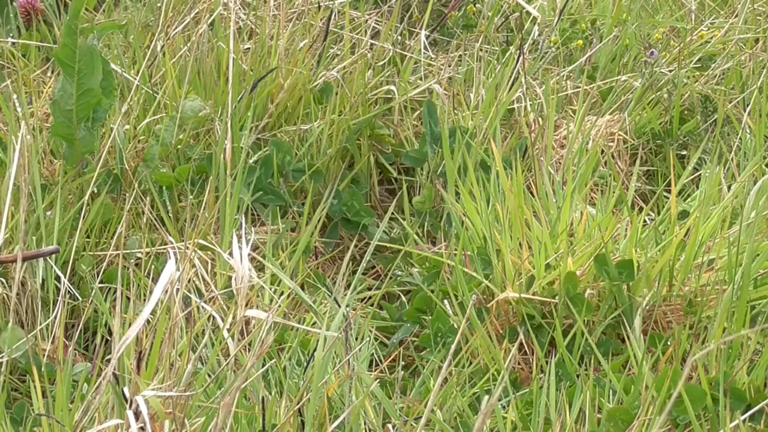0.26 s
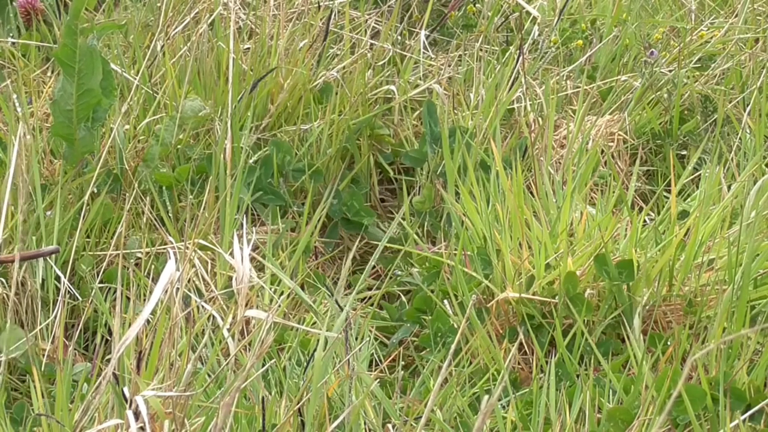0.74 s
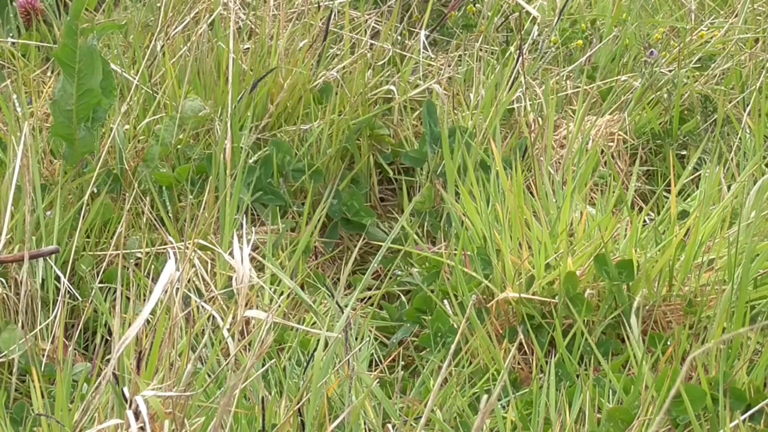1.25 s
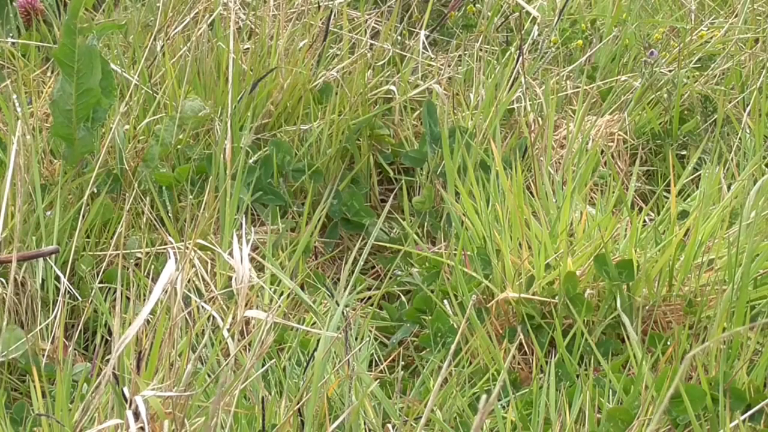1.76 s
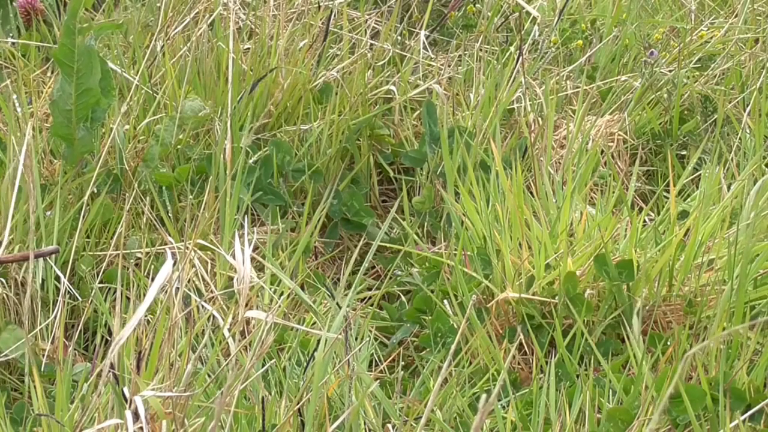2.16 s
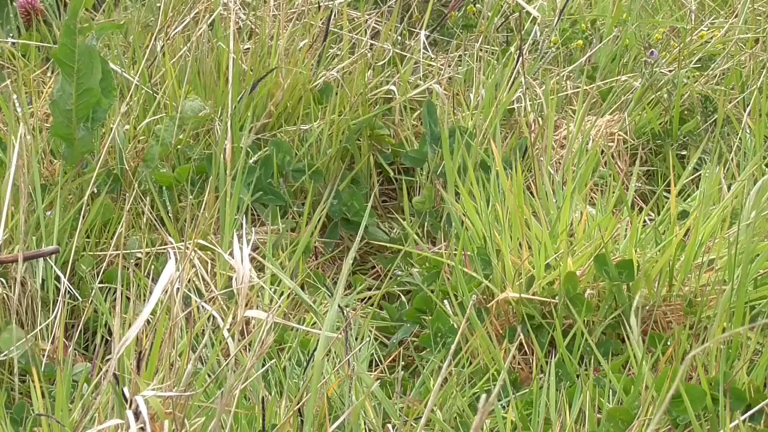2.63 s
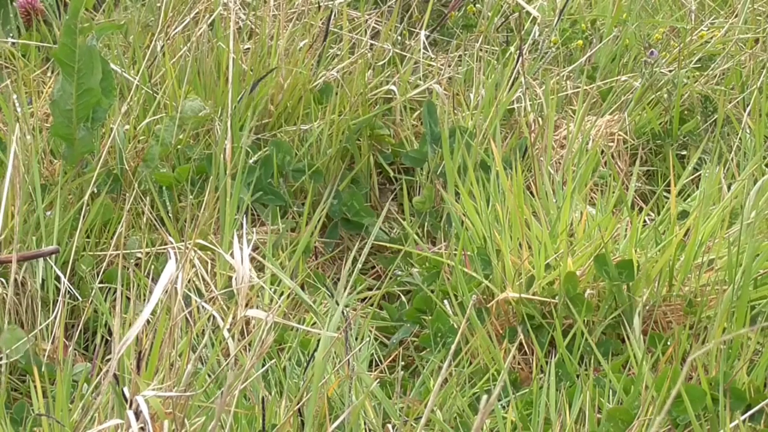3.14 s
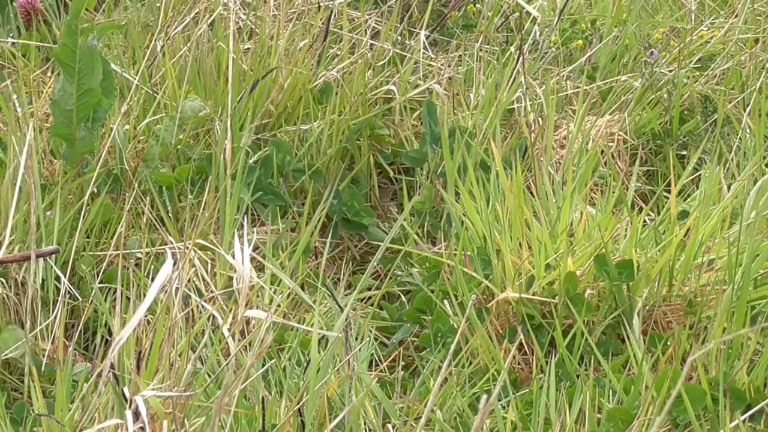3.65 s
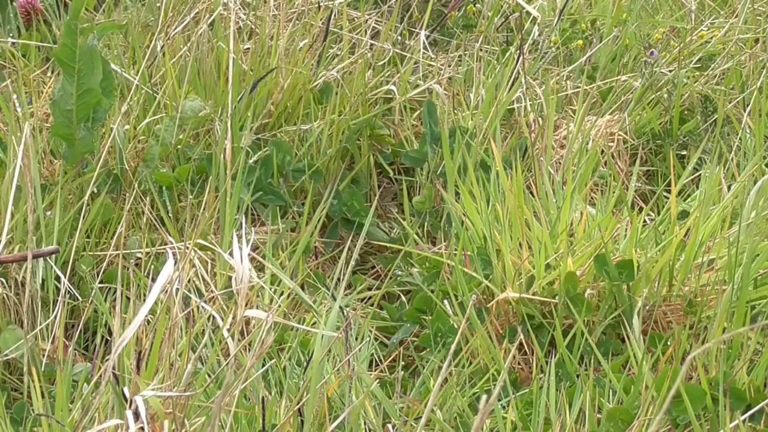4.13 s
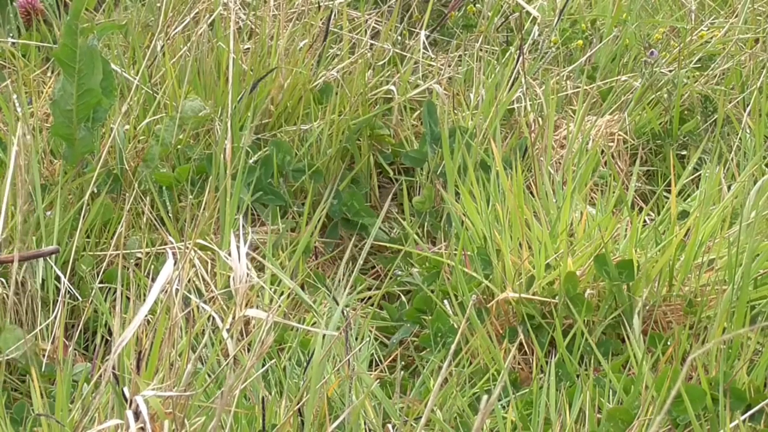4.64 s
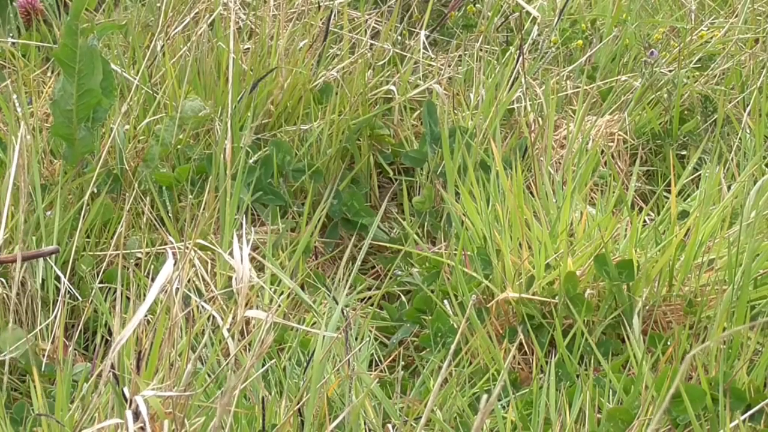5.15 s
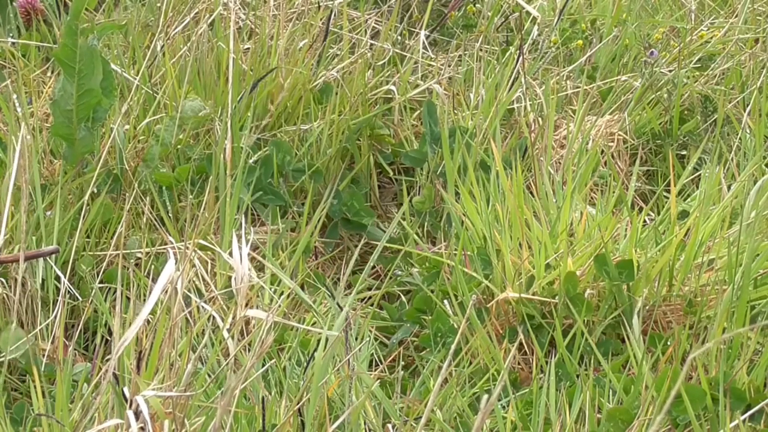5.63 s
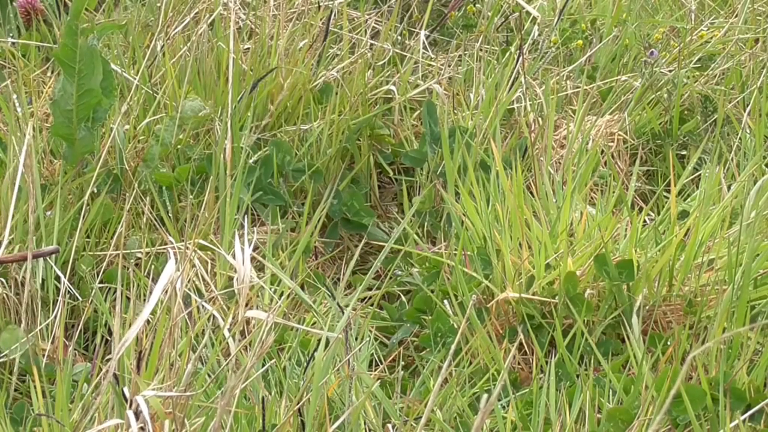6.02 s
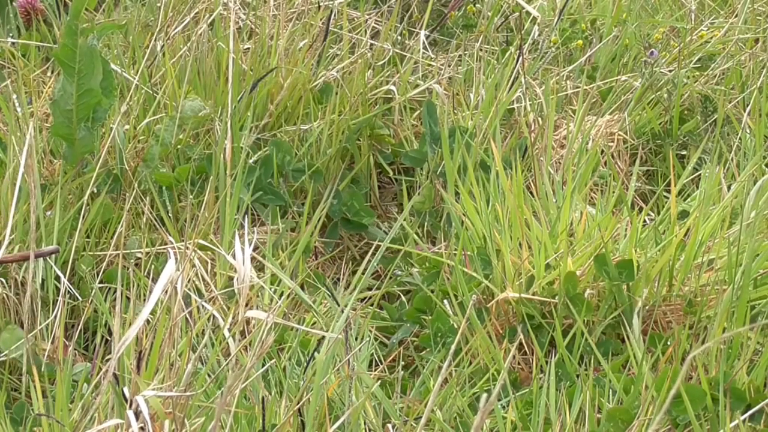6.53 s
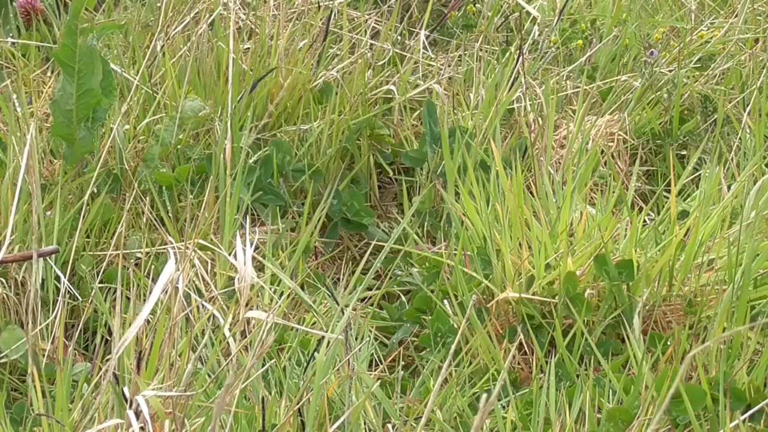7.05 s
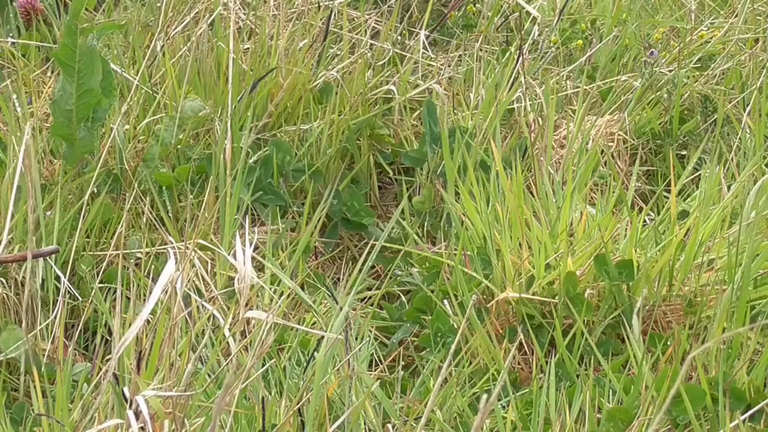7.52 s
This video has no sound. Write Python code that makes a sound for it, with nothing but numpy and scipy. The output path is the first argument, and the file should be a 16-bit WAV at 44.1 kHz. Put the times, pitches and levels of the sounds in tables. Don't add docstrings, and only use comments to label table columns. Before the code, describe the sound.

A skylark sings continuously in an open meadow, slightly right of centre: fast trills of tiny swept notes, sharp chips, buzzes and a few held falling whistles. Another lark and other birds call faintly from far away. Underneath lie a soft hiss of air and grass and a low traffic drone. Around three seconds a gust thuds into the stereo microphone, then dies away.

```python
import sys
import numpy as np
from scipy import signal
from scipy.fft import rfft, irfft, next_fast_len
from scipy.io import wavfile
from scipy.ndimage import uniform_filter1d

SR = 44100
rng = np.random.default_rng(int(sys.argv[2]) if len(sys.argv) > 2 else 0)


def undo_db(level):
    steps = np.asarray(level, float) / 20
    return 10 ** steps


def waveform_to_disk(signal):
    frames = np.transpose(np.atleast_2d(signal))
    scaled = np.clip(frames, -1, 1) * 32767
    samples = np.round(scaled).astype(np.int16)
    wavfile.write(sys.argv[1], SR, samples)


N = 343098


def unit(x):
    return x / np.sqrt(np.mean(x ** 2) + 1e-20)


def curve(rows):
    return np.interp(np.arange(N) / SR, *np.transpose(rows))


def drift(rate_hz):
    knots = rng.standard_normal(6000)
    return np.interp(np.arange(N) * rate_hz / SR, np.arange(len(knots)), knots)


def band(x, low_hz, high_hz):
    return signal.sosfilt(signal.butter(2, [low_hz, high_hz], "band", fs=SR, output="sos"), x)


def pair(right, other, table, colour):
    size = next_fast_len(N)
    log_hz = np.log(np.arange(size // 2 + 1) * SR / size + 1)
    hz, left_db, like, turn = np.transpose(table)
    left_db = np.interp(log_hz, np.log(hz), left_db)
    like = np.interp(log_hz, np.log(hz), np.clip(like, 0, 1))
    turn = np.interp(log_hz, np.log(hz), turn)
    colour_hz, colour_db = np.transpose(colour)
    gain = undo_db(np.interp(log_hz, np.log(colour_hz), colour_db))
    right, other = rfft(right, size) * gain, rfft(other, size) * gain
    shared = like * np.exp(1j * turn) * right
    left = undo_db(left_db) * (shared + np.sqrt(1 - like ** 2) * other)
    return irfft(np.array([left, right]), size)[:, :N]


def add_tone(out, s, hz, db, rise_ms, fall_ms, shape, swing_hz):
    first_s = s[0] - rise_ms / 3500
    start = round(first_s * SR)
    t = np.arange(first_s, s[-1] + fall_ms / 3500, 1 / SR)[:N]
    t = t[:N - start]
    span = slice(start, start + len(t))
    nearest_edge = np.minimum((t - t[0]) / rise_ms, (t[-1] - t) / fall_ms) * 1000
    edges = np.sin(np.pi / 2 * np.clip(nearest_edge, 0, 1)) ** 2
    pitch = np.interp(t, s, hz) + swing_hz[span]
    phase = 2 * np.pi * (np.cumsum(pitch) / SR + s[0] * 977)
    octave = undo_db(np.minimum(pitch / 80 - 89, -26)) * np.sin(2 * phase)
    tone = undo_db(np.interp(t, s, db)) * edges / edges.max() * (np.sin(phase) + octave)
    out[span] += tone * shape[span]


# time [s], level [dB].
DRONE = [(0.0, -54.5), (0.13, -65), (0.65, -51.5), (1.58, -67.5), (2.2, -55.5), (2.65, -58.5),
         (3.18, -52.5), (3.79, -65.5), (4.75, -52.5), (5.1, -54), (5.7, -57.5), (6.1, -52), (6.4, -56.5),
         (6.8, -52), (7.2, -55.5), (7.78, -61.5)]
# frequency [Hz], level per Hz [dB].
MEADOW_COLOUR = [(30, -8.5), (110, -2.5), (250, -14.5), (560, -18.5), (950, -13.5), (1800, -26),
                 (2400, -29.5), (3900, -32.5), (6100, -38), (8500, -31.5), (15600, -34)]
# frequency [Hz], left over right [dB], likeness [0-1], phase of left [rad].
FIELD_PAIR = [(45, -1, .6, -3.1), (160, 7, .3, -.6), (360, 9, .85, -1.0), (900, 1.6, .7, -1.67),
              (2500, 0, .5, -1.5), (7000, 1.5, .1, -1.2)]
# frequency [Hz], boost [dB].
BIRD_COLOUR = [(5900, 1.5), (7000, 5), (9500, 4.5)]


def meadow():
    noise = rng.standard_normal((4, N))
    hiss = unit(pair(noise[0], noise[1], FIELD_PAIR, MEADOW_COLOUR))
    hiss = undo_db(-54 + .5 * drift(3.18)) * hiss
    upper = band(band(noise[2:], 277, 432), 277, 432)
    lower = band(band(noise[:1:-1], 150, 234), 150, 234)
    upper = unit(pair(*upper, FIELD_PAIR, BIRD_COLOUR))
    lower = unit(pair(*lower, FIELD_PAIR, BIRD_COLOUR))
    drone = unit(upper + undo_db(-6.5) * lower)
    return hiss + undo_db(curve(DRONE) + 1.5 + 2.2 * drift(9)) * drone


# start [s], length [ms], start pitch [Hz], end pitch [Hz], peak level [dB].
FAR_NOTES = [(.02, 220, 1493, 1250, -60.5), (1.76, 130, 5500, 5600, -65), (2.55, 48, 2270, 2260, -63),
             (4.697, 20, 4900, 4060, -59), (4.718, 40, 4140, 4700, -65.5), (5.82, 160, 2270, 2000, -68.5),
             (6.32, 71, 2020, 2000, -69), (6.7, 110, 2870, 3140, -76), (6.985, 75, 6120, 5700, -62),
             (2.37, 24, 4800, 4020, -57), (2.4, 30, 4000, 4350, -63), (2.8, 110, 2100, 2040, -72),
             (6.34, 64, 3120, 3060, -77), (7.065, 31, 4100, 3180, -61), (6.95, 78, 2000, 2000, -74),
             (7.17, 70, 2550, 2370, -69), (3.91, 150, 5640, 5750, -74), (7.13, 56, 5670, 5800, -59.5)]
# start [s], peak level of the closing glide [dB].
FAR_CALLS = [
    (0.817, -53),
    (2.258, -70),
    (3.238, -61),
    (4.1, -55.5),
    (5.864, -54.5),
    (6.435, -54.5),
]
# length [ms], start pitch [Hz], end pitch [Hz],
# level against the glide [dB], warble swing [Hz].
FAR_PARTS = [
    (38, 5750, 5400, -8, 60),
    (68, 5450, 5750, -6, 280),
    (55, 5020, 4570, 0, 20),
]


def far_larks():
    out = np.zeros(N)
    beat = np.sin(2 * np.pi * np.cumsum(90 * undo_db(2.3 * drift(25))) / SR)
    flutter = undo_db(1.2 * drift(90))
    glides = [(*row, 175 if row[2] > 5200 else 80) for row in FAR_NOTES]
    for s, db in FAR_CALLS:
        for ms, start_hz, end_hz, change_db, swing_hz in FAR_PARTS:
            glides.append((s, ms, start_hz, end_hz, db + change_db, swing_hz))
            s += ms / 1000
    for s, ms, start_hz, end_hz, db, swing_hz in glides:
        times = [s, s + ms / 1000]
        add_tone(out, times, [start_hz, end_hz], [db, db], 12.5, 14.0, flutter, swing_hz * beat)
    return out


# time [s], pitch [Hz], level [dB].
WHISTLES = [
    [(.972, 6200, -66), (.988, 4940, -44.5), (1.012, 4370, -44), (1.127, 4175, -43)],
    [(1.49, 3160, -47), (1.508, 3200, -44.5), (1.517, 4380, -44), (1.527, 4340, -47), (1.538, 3970, -55)],
    [(2.145, 5560, -48), (2.165, 4610, -38), (2.18, 4200, -44.5), (2.2, 3960, -41), (2.36, 3720, -42.5),
     (2.378, 3570, -45)],
    [(4.27, 1900, -56), (4.277, 3500, -41.5), (4.286, 3920, -40), (4.296, 3750, -45)],
    [(5.595, 3400, -45), (5.633, 4630, -35)],
    [(7.426, 4700, -50), (7.432, 5080, -41), (7.47, 4990, -46), (7.53, 5065, -42.5), (7.544, 4940, -46)],
    [(5.359, 3476, -39.5), (5.39, 3430, -40), (5.401, 3230, -48)],
    [(5.464, 3340, -39), (5.468, 4230, -43), (5.485, 4740, -43)],
]
# time [s], pitch [Hz], peak level [dB].
FLICKS = [(.654, 4640, -40.5), (.699, 4830, -34.5), (.9105, 5000, -38), (1.238, 3900, -41),
          (1.2548, 3600, -38.5), (1.6268, 4310, -47), (1.6966, 4530, -38.5), (1.798, 4960, -38),
          (1.8999, 4920, -35.5), (1.971, 3990, -39), (2.4685, 4030, -38.5), (2.4835, 3670, -40),
          (2.8658, 4100, -39), (2.9363, 4660, -32), (3.033, 5100, -41), (3.1282, 5210, -43),
          (3.2037, 4300, -36.5), (3.627, 3160, -42), (3.6766, 2680, -43.5), (3.6961, 2600, -40.5),
          (5.9265, 4470, -45), (6.3381, 4730, -45), (6.6448, 5760, -50), (7.5945, 4660, -39),
          (7.6257, 5180, -44), (7.7735, 4770, -43), (7.6375, 5480, -45)]
HOOKS = [(1.6348, 3900, -42.5), (1.7036, 4290, -42), (1.807, 4710, -41), (1.9098, 4840, -45.5),
         (2.876, 3770, -41.5), (2.9463, 4530, -40.5), (3.043, 4850, -38.5), (3.138, 5030, -43)]
SPIKES = [(3.832, 4190, -44), (3.948, 4520, -41.5), (4.052, 4440, -41.5)]
ARCHES = [(.0693, 5270, -45), (.105, 4800, -33.5), (.1629, 3650, -35), (.218, 4090, -36.5),
          (.258, 4080, -32.5), (.355, 3900, -37.5), (.372, 3910, -50)]
TAILS = [(1.2677, 3450, -42), (1.4056, 3200, -45), (2.4987, 3530, -39), (2.6223, 3220, -44.5),
         (2.6409, 3100, -44), (5.736, 3150, -46)]
STEPS = [(.5144, 3820, -40.5), (1.5639, 2140, -49.5), (1.9843, 2990, -41.5), (2.002, 2540, -45),
         (2.0542, 2144, -46), (3.2169, 3240, -40.5), (3.232, 2580, -43), (3.3017, 2095, -49),
         (3.502, 4820, -39.5), (3.5298, 4390, -40), (3.611, 3340, -40.5), (3.783, 3680, -40.5),
         (4.229, 2400, -49), (4.3182, 2165, -46), (4.8911, 3463, -40.5), (5.137, 3060, -43.5),
         (5.5389, 2250, -44.5), (6.7943, 5280, -42.5), (6.829, 4900, -41), (6.9874, 5020, -39),
         (7.1911, 4180, -41), (7.724, 2600, -51)]
PIPS = [(.037, 4750, -35), (.0604, 4540, -35.5), (.4898, 4130, -35), (.502, 4110, -35), (.5962, 1860, -57),
        (1.2044, 4420, -46), (1.2215, 4120, -44), (2.4339, 4460, -41.5), (2.451, 4080, -40),
        (3.433, 5280, -50), (3.47, 5150, -44), (3.491, 5030, -66), (3.775, 2750, -50), (5.3163, 3570, -43),
        (5.3419, 3570, -42), (5.3505, 3480, -40.5), (5.7039, 3530, -45.5), (5.722, 3290, -43),
        (5.9336, 3930, -42), (5.957, 3600, -38), (6.3479, 5020, -44), (6.4338, 5090, -44),
        (6.5043, 5200, -52), (6.654, 5420, -47), (6.678, 5290, -43), (6.7177, 4870, -45.5),
        (5.5, 4960, -38.5)]
BUZZES = [(4.3715, 5210, -42.5), (4.4284, 4760, -32.5), (4.472, 4520, -46), (4.7535, 5060, -40),
          (4.836, 4590, -42)]
RAKES = [(.4415, 3130, -55), (.4485, 3270, -42.5), (.4705, 3170, -42), (3.4265, 4630, -45.5),
         (3.481, 4370, -42.5)]
SCOOPS = [(6.092, 3320, -44.5), (6.2715, 2980, -50.5)]
FEET = [(6.0885, 2320, -50.5), (6.268, 1920, -51.5)]
DIPS = [(5.9705, 4110, -45), (6.019, 3600, -58), (6.069, 2790, -49), (7.691, 4140, -45),
        (7.7185, 3080, -51), (3.438, 5300, -48), (3.493, 5100, -57)]
VAULTS = [(5.7505, 3200, -49), (5.768, 3290, -51), (5.786, 3040, -47.5), (5.804, 2750, -51)]
TREADS = [(7.6495, 5070, -44), (7.671, 4290, -42), (7.698, 3250, -43.5)]
DROPS = [(.536, 3380, -39.5), (.5585, 2520, -43), (.579, 2270, -48), (.664, 4260, -41.5), (.898, 4460, -42),
         (5.6417, 5220, -37.5), (6.7796, 6600, -49), (7.602, 4740, -40), (4.301, 3090, -42)]
DIVES = [(1.542, 3510, -45), (5.4391, 3500, -43), (5.5175, 3230, -45)]
STABS = [(4.1724, 3120, -49), (4.178, 3250, -41), (4.192, 2900, -43.5), (4.199, 3200, -43.5),
         (4.212, 2700, -44), (4.218, 2690, -43), (6.522, 4630, -43.5), (6.5361, 3900, -37.5),
         (6.5578, 3750, -36), (6.568, 4540, -37.5), (6.7565, 5200, -49)]
SLIDES = [(7.2685, 2985, -39.5), (7.2969, 3680, -43.5), (7.322, 4120, -40.5), (7.371, 4150, -45.5)]
HOLDS = [(3.802, 2770, -50), (3.85, 2774, -49), (4.019, 2880, -52), (4.072, 2980, -55),
         (6.605, 4834, -41.5)]
CLAWS = [(5.9735, 3790, -38), (5.9895, 3680, -38), (6.0735, 3380, -41.5)]
ZIGZAGS = [(5.2135, 4560, -41.5), (5.2635, 4570, -40), (5.272, 4590, -57)]
CHOPS = [(6.847, 4630, -39), (6.869, 4600, -34), (6.9385, 4520, -37)]
# its key notes, length [ms], share spent reaching the pitch [0-1],
# start over pitch [ratio], end over pitch [ratio], loss an octave off pitch [dB].
GESTURES = [(FLICKS, 6, .6, .86, 1.01, 32), (HOOKS, 15, .2, .82, 1.03, 35), (SPIKES, 15, .25, .62, .82, 3),
            (ARCHES, 11, .4, .9, .85, 20), (TAILS, 11.5, .5, .85, .68, 20),
            (STEPS, 10.5, .25, .95, .96, 15), (PIPS, 6.3, .35, .94, .99, 10),
            (BUZZES, 7.5, .65, .81, .9, 10), (RAKES, 5, .7, .74, 1.01, 12), (SCOOPS, 5, .6, .68, 1.04, 5),
            (DROPS, 10, .18, 1.01, .72, 10), (DIVES, 16, .58, 1.03, .56, 6),
            (STABS, 3.8, .3, 1.06, .74, 12), (SLIDES, 23, .82, 1.09, .88, 5), (HOLDS, 33, .4, 1.01, .98, 5),
            (CLAWS, 6.5, .45, .68, 1.02, 13), (ZIGZAGS, 9.5, .55, .84, .88, 8),
            (CHOPS, 6, .4, 1.05, .78, 20), (DIPS, 3.5, .2, 1.02, .66, -6), (VAULTS, 11, .52, .62, .6, -4),
            (TREADS, 21, .2, 1.01, .94, 5), (FEET, 4.5, .6, .88, 1.1, 0)]
RUNS = [{0: 2, 1: 10, 5: 2, 6: 3, 7: 3, 12: 2, 13: 3, 14: 3, 17: 3}, {0: 2, 1: 3, 2: 3, 4: 2, 5: 3, 6: 3},
        {0: 2, 1: 2}, {0: 2, 1: 3, 3: 2, 4: 5}, {0: 9, 2: 8}, {3: 3, 6: 4, 8: 2, 9: 5, 14: 14, 17: 2, 19:
        12}, {0: 3, 5: 2, 7: 2, 9: 2, 13: 3, 16: 2, 18: 2, 20: 8, 23: 2, 24: 4}, {0: 8, 1: 6, 3: 12}, {1: 3,
        3: 3}, {0: 9}, {3: 11}, {}, {7: 2}, {2: 2}, {1: 3}, {1: 5}, {0: 5}, {1: 3}, {0: 3, 1: 3, 5: 3}, {},
        {}, {0: 9}]


def song():
    notes, chance = [], iter(rng.standard_normal((600, 2)))
    for (keys, ms, reach, start, end, loss_db), runs in zip(GESTURES, RUNS):
        bend = np.array([start, 1, end])
        shares = np.array([0, np.clip(reach, .05, .95), 1])
        rise_ms, fall_ms = min(0.35 * ms, 5), min(0.59 * ms, 10)
        for row, (key, after) in enumerate(zip(keys, keys[1:] + keys[-1:])):
            for s, hz, db in np.linspace(key, after, runs.get(row, 1), endpoint=False):
                pitch_chance, level_chance = next(chance)
                when = s - .001 + shares * (ms + 1) / 1000
                pitch = hz * bend * (1 + pitch_chance / 200)
                level = db + level_chance - loss_db * np.abs(np.log2(bend))
                notes.append((when, pitch, level, rise_ms, fall_ms))
    return notes + [(*np.transpose(whistle), 5.5, 7.0) for whistle in WHISTLES]


# from [s], to [s], comes again after [s], level change [dB].
REPEATS = [
    (1.48, 1.59, 1.23, 2.5),
    (4.16, 4.25, 0.38, -2),
    (4.26, 4.34, .378, -2),
]


def lark():
    notes = song()
    notes += [(s + later, hz, db + change_db, *edges) for first, last, later, change_db in REPEATS
              for s, hz, db, *edges in notes if first < s[0] < last]
    out = np.zeros(N)
    tremor = undo_db(1.3 * drift(250))
    waver_hz = 35 * drift(400)
    for note in notes:
        held = note[0][-1] - note[0][0] > .025
        add_tone(out, *note, tremor ** (.3 if held else 1), waver_hz * (.1 if held else 1))
    return out * undo_db(0.56)


# time [s], peak level [dB].
SNAPS = [(0.111, -51), (0.72, -52), (0.7404, -51), (0.8446, -55), (1.727, -57), (1.8685, -62),
         (1.9173, -50), (2.147, -49.5), (3.148, -51), (3.4723, -50), (4.002, -54), (4.273, -56),
         (4.65, -58), (5.5026, -57), (5.6291, -50), (6.708, -53), (6.755, -53), (6.8483, -53), (6.868, -51),
         (6.892, -56), (6.9157, -58), (7.629, -52)]


def snaps():
    t, out = np.arange(300) / SR, np.zeros(N)
    swell = np.exp(-((t * 1000 - 2.5) / 1.6) ** 2)
    for (s, db), burst in zip(SNAPS, rng.standard_normal((len(SNAPS), len(t)))):
        start = int(s * SR)
        out[start:start + len(t)] += undo_db(db) * burst * swell
    return band(out, 4100, 11000)


def grass_echo(x):
    t = np.arange(SR // 8) / SR
    tail = rng.standard_normal((2, len(t))) * undo_db(-60 * t / 0.15) * (t > .002)
    tail = tail / np.sqrt(np.sum(tail ** 2, axis=1, keepdims=True))
    return signal.fftconvolve(x, tail, axes=1)[:, :N]


# time [s], level [dB].
WIND = [(0.0, -105), (0.57, -82), (2.7, -97), (2.748, -58.5), (2.9, -40.5), (3.0, -40.5), (3.05, -37.5),
        (3.12, -40), (3.372, -39.5), (3.412, -46), (3.55, -49), (3.62, -43.5), (3.75, -49.5), (3.9, -49),
        (4.1, -48), (4.3, -79), (7.56, -88), (7.78, -45.5)]


def wind():
    lumpy_db = curve(WIND) + 2.0 * drift(22)
    push = rng.standard_normal((2, N))
    deep = unit(band(band(push, 56.6, 139), 64, 133)) * undo_db(lumpy_db + 12.5)
    low = unit(band(band(push[::-1], 118.0, 194), 106, 215)) * undo_db(1.54 * (lumpy_db + 38) - 28.0)
    high = unit(band(band(push, 150, 484), 230, 485)) * undo_db(1.8 * (lumpy_db + 39.5) - 46.5)
    opposed, own = deep + low + high
    port_limit = .2
    opposed = port_limit * np.tanh(opposed / port_limit)
    return opposed * undo_db([[-.7], [.7]]) * [[-1], [1]] + .26 * own


# frequency [Hz], left over right [dB], likeness [0-1], phase of left [rad].
BIRD_PAIR = [(2000, -5, 0.92, -1.88), (3900, -3.5, 0.69, -1.67), (5100, -1.5, 0.92, -1.99)]


def scene():
    near = pair(lark() + snaps(), np.zeros(N), BIRD_PAIR, BIRD_COLOUR)
    far = far_larks() * undo_db([[-1.5], [-2.5]])
    echoes = undo_db(-15.5) * grass_echo(near) + undo_db(-7.0) * grass_echo(far)
    return near + far + echoes + meadow() + wind()


def thinned(x):
    hz, _, spec = signal.stft(x, SR, "cosine", nperseg=1024, noverlap=512)
    level = 10 * np.log10(uniform_filter1d(np.abs(spec) ** 2, size=7, axis=1) + 1e-20)
    fall = (7 * hz / 1000)[:, None]
    loud = np.where(hz[:, None] > 2000, level + fall, -300)
    skirt = np.maximum.accumulate(loud, axis=1) - fall - 21
    below_skirt = np.clip((skirt - level) / 2, 0, 1)
    quieter = spec * undo_db(-28 * below_skirt)
    return signal.istft(quieter, SR, "cosine", nperseg=1024, noverlap=512)[1][:, :N]


def top_cut(x):
    return signal.sosfilt(signal.butter(12, 15780, fs=SR, output="sos"), x)


def record(dry):
    mix = thinned(dry)
    return top_cut(mix)


dry = scene()
out = record(dry)
waveform_to_disk(out)
```